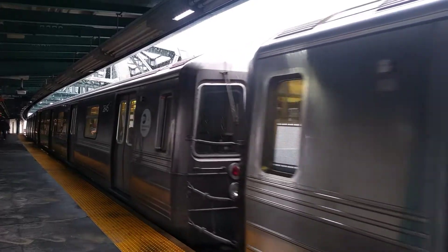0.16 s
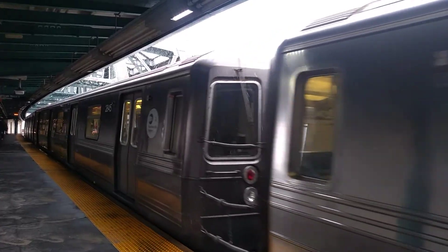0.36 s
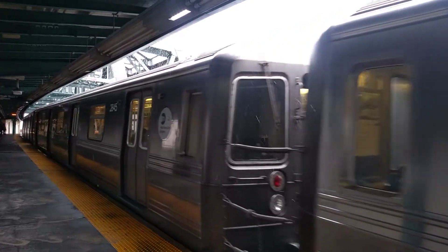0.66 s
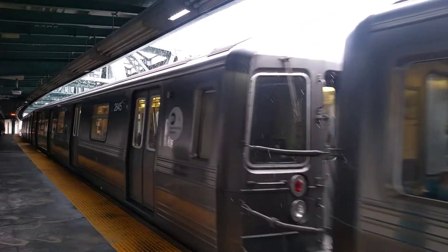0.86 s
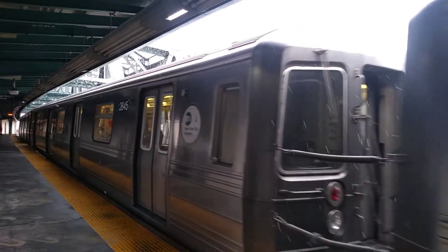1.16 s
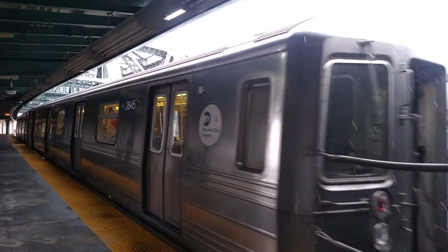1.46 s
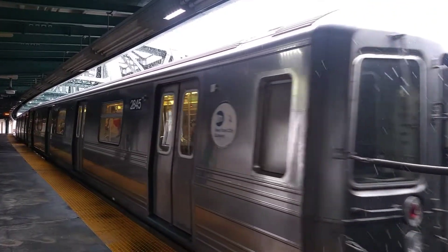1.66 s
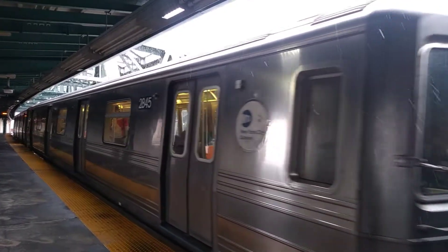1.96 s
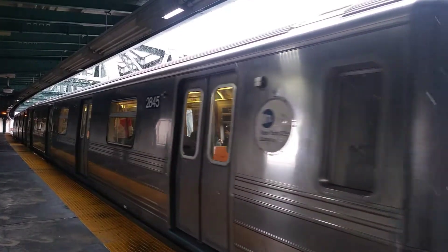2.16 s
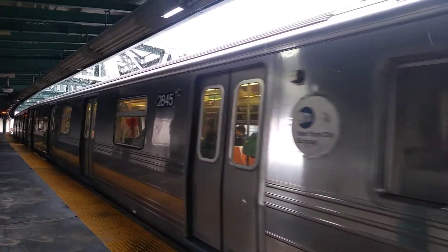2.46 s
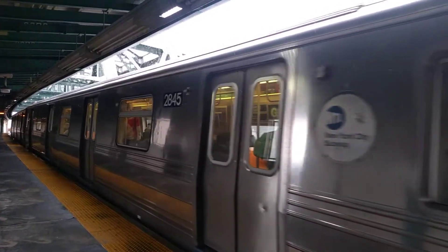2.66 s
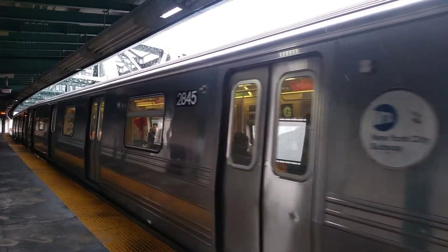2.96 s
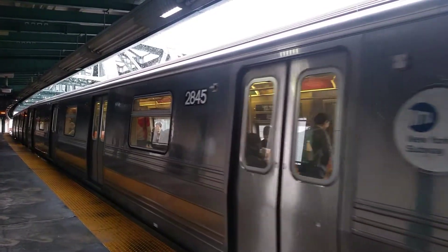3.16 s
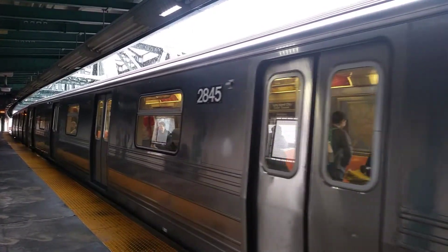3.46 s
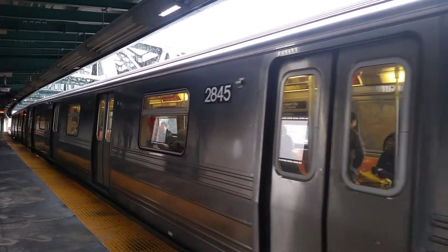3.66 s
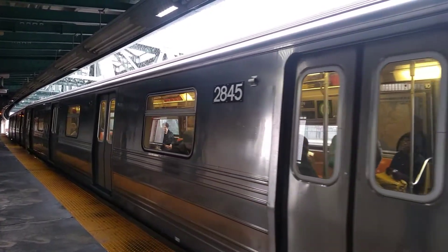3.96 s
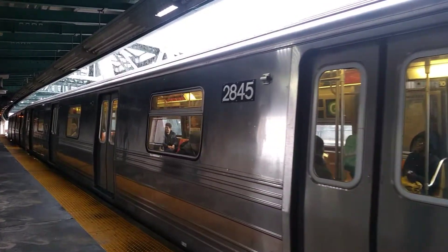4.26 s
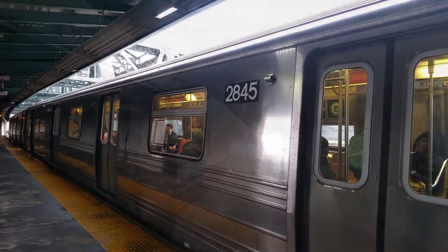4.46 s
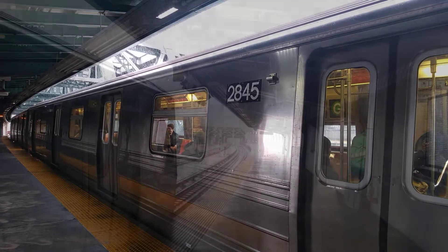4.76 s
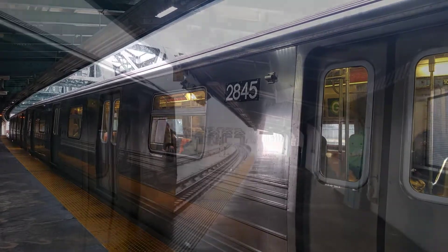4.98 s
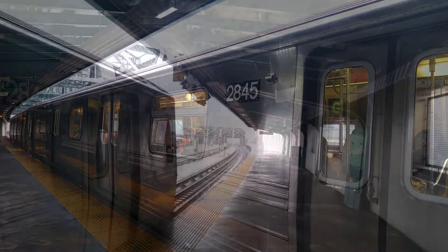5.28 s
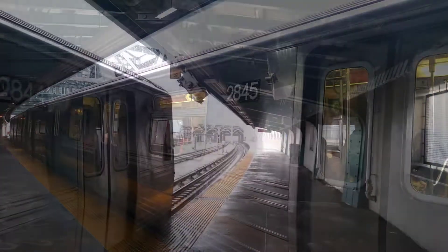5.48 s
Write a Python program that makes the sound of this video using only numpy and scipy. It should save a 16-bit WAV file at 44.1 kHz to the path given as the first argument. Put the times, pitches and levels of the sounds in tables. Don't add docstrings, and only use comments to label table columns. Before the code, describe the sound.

Stereo microphone beside a braking train under a station roof: deep structural rumble, gritty wheel roll and broad air hiss run throughout. Very high brake chirps open, pause, then return denser in the second half, gliding up and down with short echoes. Metal knocks and brief groans punctuate. The hiss drops away, the train jolts, sound cuts out momentarily, and quiet platform hum with thin leaking air swells up.

```python
import sys
import numpy as np
from scipy import signal
from scipy.fft import rfft, irfft, next_fast_len
from scipy.io import wavfile
from scipy.ndimage import uniform_filter1d

SR = 44100
rng = np.random.default_rng(int(sys.argv[2]) if len(sys.argv) > 2 else 0)


def transcribe(signal):
    frames = np.atleast_2d(signal).T
    limited = np.clip(frames, -1, 1)
    pcm = np.round(limited * 32767).astype(np.int16)
    wavfile.write(sys.argv[1], SR, pcm)


def level_to_linear(level):
    exponent = np.asarray(level, float) / 20
    return 10 ** exponent


N = 247822
TIME = np.arange(N) / SR
CUT_S, RESUME_S = 5.3565, 5.4355
AIR_DB = -40.5


def rms_one(x):
    return x / np.sqrt(np.mean(x ** 2) + 1e-20)


def at_hz(points, hz):
    points_hz, points_db = np.transpose(points)
    return np.interp(np.log(np.maximum(hz, 1)), np.log(points_hz), points_db)


def drift(rate_hz, size=N):
    r = np.exp(-40 * np.pi * rate_hz / SR)
    noise = rng.standard_normal(N // 20 + 2002)
    slow = signal.lfilter([1], [1, -2 * r, r * r], noise)[2000:]
    return np.interp(np.arange(size) / 20, np.arange(len(slow)), rms_one(slow))


def swell(start_s, length_s, attack_s):
    rise = np.clip((TIME - start_s) / attack_s, 0, 1)
    return rise * np.exp(-np.clip(TIME - start_s - length_s, 0, None) * 4 / length_s)


def narrow_noise(hz, width_hz):
    edges_hz = [max(hz - width_hz / 2, 50), hz + width_hz / 2]
    band = signal.butter(2, edges_hz, "band", fs=SR, output="sos")
    return rms_one(signal.sosfilt(band, rng.standard_normal((3, N))))


def diffuse_noise(spectrum, patchy_db):
    size = next_fast_len(N)
    hz = np.fft.rfftfreq(size, 1 / SR)
    low_hz, high_hz = spectrum[0][0], spectrum[-1][0]
    coloured = rfft(rng.standard_normal((3, size))) * level_to_linear(at_hz(spectrum, hz))
    coloured *= (hz > 0.8 * low_hz) & (hz < 1.1 * high_hz)
    octave = np.log2(np.maximum(hz, 1) / low_hz)
    together = drift(12.0)
    out = np.zeros((3, N))
    for centre in np.arange(0, np.log2(high_hz / low_hz) + 1):
        band = np.cos(np.pi / 2 * np.clip(octave - centre, -1, 1)) ** 2
        flicker_db = patchy_db * (0.26 * together + drift(15.7))
        out += irfft(coloured * band, size)[:, :N] * level_to_linear(flicker_db)
    return rms_one(out)


def wheels_db():
    # start_s, level_db
    wheels = [
        (0, -38.5),
        (.4, -42),
        (1.9, -43.5),
        (3.3, -44),
        (3.9, -42),
        (4.6, -42.5),
        (5.0, -47),
        (5.36, -46.5),
    ]
    return np.interp(TIME, *np.transpose(wheels))


def rumble():
    # pitch_hz, level_db
    spectrum = [(16, -47), (28, -25), (59, 2.5), (102, -3), (141, 0.5), (248, -4.5), (304, -7), (564, -19),
                (700, -21), (910, -47), (1540, -120)]
    # start_s, length_s, extra_db
    shudders = [
        (0, 0.19, 4),
        (.7, 0.43, 2.5),
        (5.042, 0.26, 4),
    ]
    rolling_db = wheels_db()
    level_db = -33 + 0.25 * (rolling_db - rolling_db.mean())
    for start_s, length_s, extra_db in shudders:
        level_db += extra_db * swell(start_s - 0.05, length_s, 0.092)
    return level_to_linear(level_db) * diffuse_noise(spectrum, patchy_db=1.0)


def rolling():
    # pitch_hz, level_db
    spectrum = [(250, -10), (500, 1), (1000, 0.5), (1500, 0.5), (2000, -5), (2550, -4), (3200, -16),
                (5000, -18), (9000, -30)]
    return level_to_linear(wheels_db() + 3.0) * diffuse_noise(spectrum, patchy_db=1.7)


def air_db():
    valve_s, closing_s, left_over_db = 4.857, 0.068, -68.5
    return AIR_DB + (left_over_db - AIR_DB) / (1 + np.exp((valve_s - TIME) / closing_s))


def brake_air():
    # pitch_hz, level_db
    spectrum = [(1500, -24), (2500, -4.5), (3300, -3.5), (4000, 0), (5500, 1.5), (8000, 0), (9500, -6.5),
                (10500, -12), (14500, -18)]
    return level_to_linear(air_db() + 7.0) * diffuse_noise(spectrum, patchy_db=0.96)


def shoes(rows, flutter_hz, steady, octave_db):
    lead_s, grab_s, let_go_db_per_s = 0.05, 0.028, 252
    throb_hz, throb_wander, throb_db = 24.13, 0.29, 3
    out = np.zeros(N + SR)
    after_s = TIME[:SR] - lead_s
    for start_s, length_s, from_hz, to_hz, level_db in rows:
        flutter = 2 * steady + drift(flutter_hz, SR) + 1j * drift(flutter_hz, SR)
        flutter /= np.sqrt(4 * steady ** 2 + 2)
        glide_hz = np.interp(after_s, [0, length_s], [from_hz, to_hz])
        tone = flutter * np.exp(2j * np.pi * np.cumsum(glide_hz) / SR)
        octave = tone ** 2 / (abs(tone) + 0.082)
        fall_db = let_go_db_per_s * np.clip(after_s - length_s, 0, 1)
        grab = np.clip(after_s / grab_s + 0.5, 0, 1) * level_to_linear(level_db + 1.5 - fall_db)
        bounce_hz = throb_hz * np.exp(throb_wander * drift(8.4, SR))
        grab *= level_to_linear(throb_db * np.sin(2 * np.pi * np.cumsum(bounce_hz) / SR))
        first = int(max(start_s, 0) * SR)
        out[first:first + SR] += grab * (tone.real + level_to_linear(octave_db) * octave.real)
    return out[SR // 20:][:N]


def squeals():
    # start_s, length_s, from_hz, to_hz, level_db
    soft_rows = [(0, 0.018, 4845, 4810, -23), (0, 0.069, 4680, 4655, -30.5), (.05, 0.19, 4790, 4770, -45),
                 (.28, 0.17, 4670, 4714, -42), (2.26, 0.197, 4640, 4677, -29.5),
                 (2.33, 0.221, 4695, 4765, -31.5), (2.56, 0.18, 4740, 4670, -30.5),
                 (2.76, 0.29, 4720, 4770, -29), (3.04, 0.096, 4690, 4684, -31.5),
                 (3.76, 0.148, 4800, 4760, -34), (3.82, 0.115, 4960, 5020, -31),
                 (3.86, 0.35, 4315, 4322, -32.5), (4.66, 0.43, 4560, 4520, -40)]
    # start_s, length_s, from_hz, to_hz, level_db
    hard_rows = [
        (3.17, 0.313, 4520, 4494, -28),
        (2.72, 0.19, 4596, 4670, -31.5),
        (2.9, 0.11, 4660, 4680, -28.5),
        (3.5, 0.13, 4520, 4550, -29.5),
        (3.56, 0.24, 4630, 4800, -34),
        (3.77, 0.0597, 4885, 4990, -34),
        (4.4, 0.27, 4454, 4590, -33),
    ]
    # start_s, length_s, from_hz, to_hz, level_db
    firm_rows = [
        (.085, 0.057, 4648, 4655, -22),
        (.18, 0.088, 4650, 4700, -24.5),
        (.475, .045, 4680, 4670, -39),
        (2.18, 0.11, 4683, 4645, -29.5),
        (3.1, 0.095, 4540, 4520, -28.5),
        (3.35, 0.079, 4640, 4645, -22),
        (3.46, 0.085, 4660, 4645, -31.5),
        (4.16, 0.24, 4397, 4460, -31.5),
        (4.61, 0.47, 4724, 4712, -37),
    ]
    # start_s, length_s, from_hz, to_hz, level_db
    third = (4.48, .11, 13500, 13720, -49)
    out = shoes(soft_rows, flutter_hz=41, steady=0.5, octave_db=-20)
    out += shoes(hard_rows, flutter_hz=31, steady=0.78, octave_db=-13)
    out += shoes(firm_rows, flutter_hz=24, steady=1.45, octave_db=-22)
    out *= level_to_linear(0.86 * (air_db() - AIR_DB))
    start_s, length_s, from_hz, to_hz, level_db = third
    glide_hz = np.interp(TIME, [start_s, start_s + 1.3 * length_s], [from_hz, to_hz]) + 25.0 * drift(40.0)
    flare = np.sin(2 * np.pi * np.cumsum(glide_hz) / SR)
    return out + level_to_linear(level_db) * swell(start_s, length_s, 0.06) * flare


def under_roof(x):
    t60_s, roof_db = 0.76, -8.5
    after_s = np.arange(int(SR * 1.2)) / SR
    echoes = rng.standard_normal((3, len(after_s))) * level_to_linear(-60 * after_s / t60_s) * (after_s > 0.006)
    echoes /= np.linalg.norm(echoes, axis=1, keepdims=True)
    return x * [[1], [0.3], [0.3]] + level_to_linear(roof_db) * signal.fftconvolve(x[None], echoes, axes=1)[:, :N]


def trucks():
    # start_s, length_s, pitch_hz, level_db
    groans = [
        (0.882, 0.062, 551, -39),
        (1.16, 0.09, 616, -42),
        (3.115, 0.16, 968, -45.5),
        (3.438, 0.16, 885, -43.5),
        (3.966, 0.12, 753, -37.5),
        (4.215, 0.1, 673, -40.5),
        (4.24, 0.13, 1005, -45.5),
    ]
    # start_s, length_s, centre_hz, width_hz, level_db
    clatter = [(0.0, 0.18, 280, 170, -40.5), (0.0, 0.95, 1530, 220, -46.5),
               (1.493, 0.059, 1170, 330, -38.5), (1.6, 0.088, 1190, 200, -41.5),
               (1.5, 0.097, 2160, 1400, -40), (2.022, 0.11, 1700, 2980, -33.5),
               (2.08, 0.014, 1500, 2400, -35), (1.5, 0.033, 790, 120, -44), (2.5, 0.056, 1065, 66, -47.5),
               (3, 0.24, 4800, 400, -37), (2.04, 0.043, 6100, 5030, -40.5), (2, 0.054, 6800, 5000, -38)]
    # pitch_hz, level_db
    hums = [(815, -55), (2076, -62), (2541, -62)]
    out = np.zeros((3, N))
    for start_s, length_s, centre_hz, width_hz, level_db in clatter:
        out += level_to_linear(level_db) * swell(start_s, length_s, 0.0028) * narrow_noise(centre_hz, width_hz)
    out *= level_to_linear(2.1 * drift(90.0))
    for start_s, length_s, pitch_hz, level_db in groans:
        out += level_to_linear(level_db) * swell(start_s, length_s, 0.025) * narrow_noise(pitch_hz, 37.0)
    for pitch_hz, level_db in hums:
        out += level_to_linear(level_db) * narrow_noise(pitch_hz, 14.7)
    return out


def thumps():
    # start_s, peak_db, pitch_hz
    blows = [(0.016, -26, 128), (0.07, -17, 170), (0.395, -27, 120), (1.011, -22.5, 185), (1.057, -25, 160),
             (1.38, -19, 103), (1.41, -25.5, 120), (1.573, -13.5, 174), (1.586, -29, 135),
             (1.652, -19.5, 195), (1.691, -24, 150), (1.812, -21, 80), (1.955, -21, 129),
             (2.837, -20.5, 196), (2.868, -18, 178), (3.425, -19.5, 148), (3.444, -29, 173),
             (3.796, -22, 178), (3.828, -21, 143), (3.925, -22, 214), (4.165, -22, 125), (4.243, -20, 168),
             (4.606, -27, 214), (5.044, -26, 157), (5.055, -19, 200), (5.097, -22, 145), (5.111, -21, 176)]
    out = np.zeros(N)
    for start_s, peak_db, pitch_hz in blows:
        cycles = np.clip((TIME - start_s) * pitch_hz + 0.24, 0, None)
        swing = np.sin(2 * np.pi * cycles) * np.exp(-cycles / 0.77)
        out += rng.choice([-1, 1]) * level_to_linear(peak_db + 3.0) * swing
    return out * [[1], [0.3], [0.3]]


def self_noise():
    # pitch_hz, level_db
    spectrum = [(300, 11), (2000, -7), (4000, 5), (8000, -19), (14000, -20)]
    return level_to_linear(-63) * diffuse_noise(spectrum, patchy_db=6.0)[:2]


def platform():
    # pitch_hz, level_db
    spectrum = [(60, 5.5), (200, 8), (500, -8.5), (1500, -0.5), (2200, -4), (3200, -13.5), (4300, -15.5),
                (5300, -11), (6000, -5), (7500, -13.5), (10000, -12), (14500, -22.5)]
    # pitch_hz, level_db
    hums = [(377, -13), (754, -11), (2075, -14)]
    fade_in_db_per_s = 69
    level_db = -52 + fade_in_db_per_s * np.clip(TIME - RESUME_S, 0, 1)
    out = level_to_linear(level_db + 9.0) * diffuse_noise(spectrum, patchy_db=-2.0)
    for pitch_hz, hum_db in hums:
        out += level_to_linear(level_db + 5.0 + hum_db) * narrow_noise(pitch_hz, 9.0)
    return out + level_to_linear(-47.5) * narrow_noise(6680, width_hz=160)


def microphone(field):
    # pitch_hz, level_db
    far_port = [(100, -8.5), (600, -17.5), (1500, -8), (2600, -6), (5000, -8.5), (8000, -7.5),
                (14000, -0.5)]
    # pitch_hz, level_db
    left_tone = [(60, -5), (300, -6), (900, -2), (1700, -1.5), (2050, 3.6), (2600, -3), (4050, -1.7),
                 (4700, -4), (7200, -4), (7900, -3), (9500, -7), (14000, -14)]
    # pitch_hz, level_db
    right_only = [(100, -10), (1000, -28), (2100, -35), (4100, -3), (6100, -0.5), (7200, 1), (7800, 6),
                  (10000, 3), (14000, 11)]
    port_lag_s = 0.00049
    size = next_fast_len(N + 512)
    hz = np.fft.rfftfreq(size, 1 / SR)
    near, far, unshared = rfft(field, size)
    far = far * level_to_linear(at_hz(far_port, hz))
    late = np.exp(-2j * np.pi * hz * port_lag_s)
    kept = level_to_linear(at_hz(right_only, hz))
    left = (far - late * near) * level_to_linear(at_hz(left_tone, hz))
    right = (near - late * far + kept * unshared) / np.sqrt(1 + kept ** 2)
    return irfft(np.array([left, right]), size)[:, :N]


def hollow_sum(x):
    # centre_hz, half_width_hz, wander_hz
    hollows = [(2060, 195, 55), (4020, 160, 70)]
    hz, frame_s, cells = signal.stft(x.mean(axis=0), SR, window="cosine", nperseg=2048, noverlap=1024)
    weak = np.zeros(cells.shape)
    for centre_hz, half_hz, wander_hz in hollows:
        jumps = np.repeat(rng.standard_normal((2, len(frame_s))), 2, axis=1)[:, :len(frame_s)]
        below_hz, above_hz = half_hz + wander_hz * jumps
        weak += (hz[:, None] > centre_hz - below_hz) & (hz[:, None] < centre_hz + above_hz)
    busy = np.clip((air_db() + 57) / 4, 0, 1)
    lost = signal.istft(cells * weak, SR, window="cosine", nperseg=2048, noverlap=1024)[1][:N]
    return x - busy * lost


def thin_treble(x):
    treble_hz, drop_db = 9650, np.array([-10.5, -5.5])
    hz, _, cells = signal.stft(x, SR, window="cosine", nperseg=2048, noverlap=1024)
    power = uniform_filter1d(abs(cells) ** 2, size=7, axis=1)
    usual = uniform_filter1d(power[1], size=81, axis=0)
    usual = uniform_filter1d(usual, size=5, axis=1, origin=2)
    empty = (power < usual * level_to_linear(2 * drop_db)[:, None, None]) & (hz > treble_hz)[:, None]
    return signal.istft(cells * ~empty, SR, window="cosine", nperseg=2048, noverlap=1024)[1][:, :N]


def scene():
    arrival = rumble() + rolling() + brake_air() + under_roof(squeals()) + trucks() + thumps()
    before = (microphone(arrival) + self_noise()) * (TIME < CUT_S)
    return before + microphone(platform()) * (TIME > RESUME_S)


def band_limit(x):
    return signal.sosfilt(signal.butter(12, 14390, fs=SR, output="sos"), x)


def record(dry):
    cutoff_hz = 14520
    top_cut = signal.cheby2(16, 60, cutoff_hz * 1.01, fs=SR, output="sos")
    mix = signal.sosfilt(top_cut, thin_treble(hollow_sum(dry)))
    return band_limit(mix)


dry = scene()
out = record(dry)
transcribe(out)
```